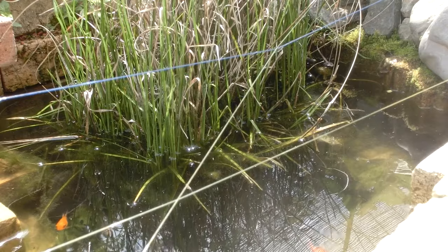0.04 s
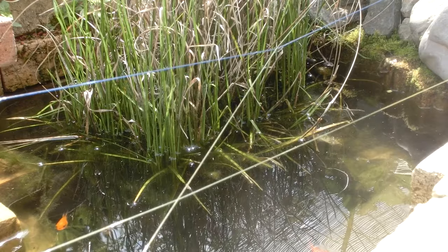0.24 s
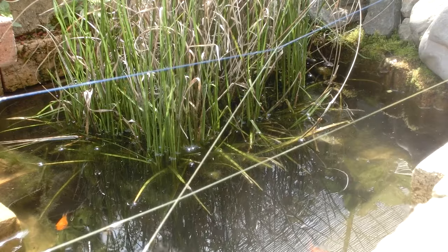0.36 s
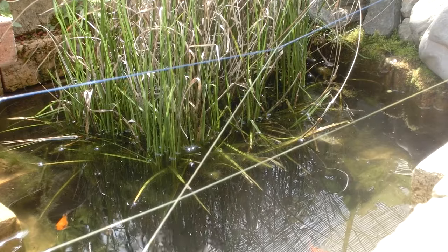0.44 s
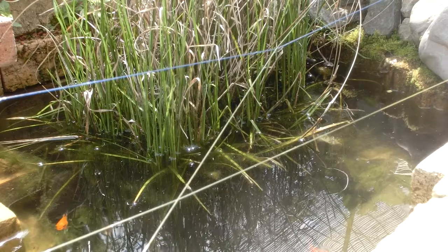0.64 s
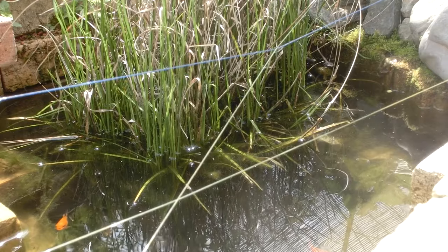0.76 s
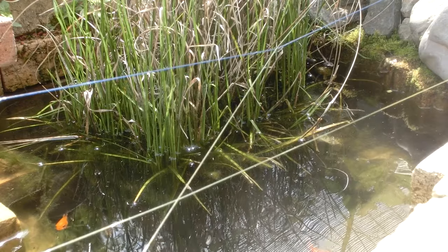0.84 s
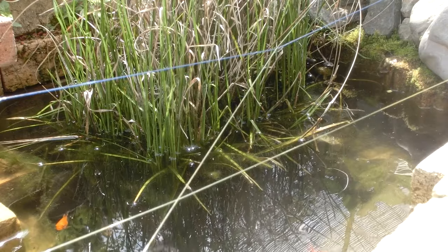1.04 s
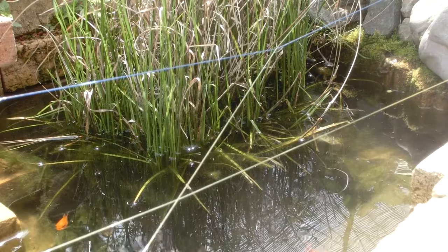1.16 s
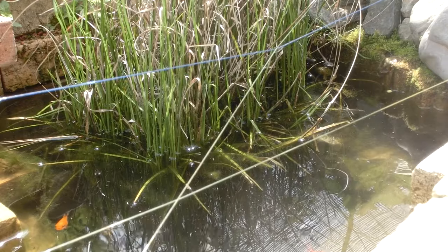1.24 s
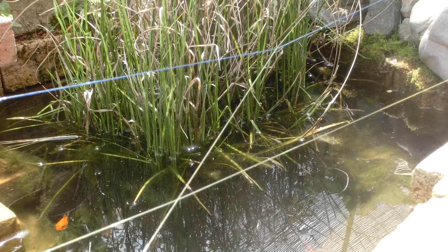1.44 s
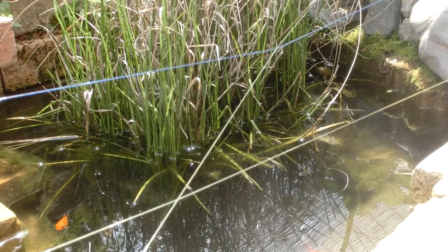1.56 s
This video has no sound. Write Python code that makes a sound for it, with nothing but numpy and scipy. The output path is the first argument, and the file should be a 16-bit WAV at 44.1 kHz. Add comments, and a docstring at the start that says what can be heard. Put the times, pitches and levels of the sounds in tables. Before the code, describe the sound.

A frog gives one short, rattling croak close by, over faint outdoor background.

```python
"""A frog gives one rattling croak from the reeds of a small garden pond, close by.
The croak is a train of larynx clicks, about 53 a second, each exciting the resonances of throat and
vocal sac; it swells and ends on a doubled click. A rasp and a low throb go with each click, and a soft
plop follows the last. Rim stones, reeds and the garden reflect the ringing clicks, over a faint
outdoor murmur and a low hum."""
import sys
import numpy as np
from scipy import signal
from scipy.fft import rfft, irfft
from scipy.io import wavfile

SR = 44100
rng = np.random.default_rng(int(sys.argv[2]) if len(sys.argv) > 2 else 0)


def output_pcm(signal):
    """Save a mono or channel-first signal as 16-bit PCM at the path in sys.argv[1].

    Samples are clipped to [-1, 1] before scaling.
    """
    pcm = np.clip(np.atleast_2d(signal).T, -1, 1) * 32767
    wavfile.write(sys.argv[1], SR, np.round(pcm).astype(np.int16))


N = 70560

# larynx clicks: t/s, level/dB, sac tuning ratio, tilt/(dB per octave), second snap gain, rasp level/dB
CLICKS = [(.12893, -26, 1, 0, .1, -13), (.15698, -25, 1, 0, .1, -12), (.17573, -21.5, 1, 0, .1, -11),
          (.19425, -11.7, .99, -.5, .05, -7), (.22836, -6.5, .99, -.3, 0, -3),
          (.24902, -4.3, .99, -.5, .05, -5), (.27307, -8.8, 1.01, 2.7, 0, 1), (.28585, -2.3, 1, .3, 0, 0),
          (.30613, -2.4, 1, 1.3, 0, 1), (.32276, -.4, .99, .6, .03, 1), (.34312, -1, 1, .7, 0, 1),
          (.36089, -.2, 1, -.7, 0, -1), (.3796, .2, 1, -.8, 0, -1), (.39864, -.1, .98, -2.8, 0, -4),
          (.4174, -.2, .97, -4, .04, -6), (.43847, -2.7, .97, -4, 0, -9), (.45683, -3.7, .97, -2, 1, 3)]


def croak():
    """Impulse excitation: each click rings the damped modes of the sac, which slackens and dulls late on."""
    # modes of throat and vocal sac: f/Hz, bandwidth/Hz, gain (negative: antiphase to the main mode)
    sac_modes = [(850, 220, -.85), (1160, 125, -3.0), (1785, 236, 10.4), (2404, 211, -2.65),
                 (2689, 115, 1.15), (3265, 1200, -.9)]
    snap_gap_s, low_cut_hz, high_cut_hz, gain_db = 0.00022, 430, 9000, 0.5
    octaves = np.log2(np.clip(frequencies(), 1400, 4000) / 1750)
    spectrum = 0
    for onset, db, tuning, tilt, second_snap, _ in CLICKS:
        ring = sum(gain * resonance(hz * tuning, width) for hz, width, gain in sac_modes)
        snaps = delay(onset) * (1 + second_snap * delay(snap_gap_s))
        spectrum += ring * snaps * amplitude(db + tilt * octaves)
    s = 1j * frequencies() / low_cut_hz
    radiation = s ** 2 / (1 + np.sqrt(2) * s + s ** 2)  # a small body radiates little bass
    softening = 1 / (1 + 1j * frequencies() / high_cut_hz)
    return irfft(spectrum * radiation * softening, N) * amplitude(gain_db)


def rasp():
    """Turbulence: air tears through the larynx at each click, and the hardest clicks also sizzle."""
    # spectrum of the rasp: f/Hz, relative level/dB
    rasp_spectrum = [(1800, -22), (2600, -21), (2850, -3), (3300, 10.5), (3900, 0), (4300, -37),
                     (6000, -32), (16000, -50)]
    # spectrum of the sizzle: f/Hz, relative level/dB
    sizzle_spectrum = [(3500, -16), (4500, -5.5), (5200, -1.5), (5750, -0.5), (6200, -5.5), (6800, 1),
                       (7600, -9), (8500, -7), (9800, -3.5), (11000, -12), (16000, -25)]
    _, click_db, *_, rasp_db = np.array(CLICKS).T
    tearing = click_bursts(rasp_db - 35.5, rasp_spectrum, decay_s=0.0024)
    sizzle_db = 2.05 * click_db - 38  # grows about as the square of the click's amplitude
    return tearing + click_bursts(sizzle_db, sizzle_spectrum, decay_s=0.0027)


def click_bursts(levels_db, spectrum, decay_s):
    """Amplitude modulation: a brief envelope at each click gates coloured noise."""
    # likeness of the two channels: f/Hz, correlation
    coherence = [(3000, 1), (6500, 0.56), (10000, 0.25)]
    envelope = sum(amplitude(db) * pulse(onset, rise_s=0.00018, decay_s=decay_s)
                   for (onset, *_), db in zip(CLICKS, levels_db))
    return envelope * coloured(stereo_noise(coherence), amplitude(curve(spectrum)))


def throb():
    """A heavily damped oscillator: the frog's body answers every click with a faint thud."""
    pushes = sum(amplitude(db) * delay(onset) for onset, db, *_ in CLICKS)
    return irfft(pushes * resonance(hz=150, width_hz=170), N) * amplitude(-19)


def plop():
    """Exponential decay of a low noise band, heard as a soft puff just after the last click."""
    envelope = pulse(onset_s=0.473, rise_s=0.008, decay_s=0.014)
    return narrow_noise(hz=390, width_hz=130) * envelope * amplitude(-47)


def pond(call):
    """Superposition: the direct call adds to stone echoes, reed scatter and the garden's reverberation."""
    # echoes from the rim stones and a farther rock: delay/s, gain
    stone_echoes = [(.002134, -.115), (.003418, -.073), (.00396, .11), (.004477, -.09), (.007918, .034),
                    (.0172, .025)]
    # scatter in the reeds: f/Hz, level/dB relative to the direct sound
    reed_spectrum = [(300, 1), (700, -9), (1700, -17), (3000, -9), (4500, -1), (6500, -19), (10000, -20),
                     (16000, -7)]
    # likeness of the two channels in the scatter: f/Hz, correlation
    reed_coherence = [(500, 0.65), (2000, 0.13), (5000, 0.93), (12000, 0)]
    # reverberation of the garden: f/Hz, level/dB relative to the direct sound
    garden_spectrum = [(300, -14), (800, -6), (1100, -14), (1800, -20), (2200, -15.5), (3000, -14.5),
                       (6000, -6), (16000, 5)]
    # likeness of the two channels in the reverberation: f/Hz, correlation
    garden_coherence = [(500, 1), (2000, 1), (8000, 0.23)]
    stones = sum(gain * delay(lag) for lag, gain in stone_echoes)
    reeds = diffuse_field(reed_spectrum, reed_coherence, t60_s=0.024, rise_s=0.00022)
    garden = diffuse_field(garden_spectrum, garden_coherence, t60_s=0.26, rise_s=0.0052)
    return irfft(rfft(call) * (1 + stones + reeds + garden), N) * pan(-1)


def diffuse_field(spectrum, coherence, t60_s, rise_s):
    """Frequency response of many small reflections that build up, then decay exponentially."""
    t = np.arange(N) / SR
    envelope = (1 - np.exp(-t / rise_s)) * np.exp(-np.log(1000) * t / t60_s)
    envelope /= np.sqrt(np.sum(envelope ** 2))
    return rfft(stereo_noise(coherence) * envelope) * amplitude(curve(spectrum))


def outdoor_air():
    """Broadband ambient noise: a distant murmur under thin hiss, its level wavering a little."""
    # spectral density of the outdoor noise: f/Hz, relative level/dB
    air_spectrum = [(15, -69), (25, -17), (92, -14.5), (137, -19), (242, -10), (270, -8.5), (335, -8),
                    (607, -6.5), (734, -9.5), (988, -12), (1740, -18.5), (1890, -17), (2480, -21.5),
                    (13600, -26.5), (16000, -33)]
    # likeness of the two channels: f/Hz, correlation
    air_coherence = [(30, 0.7), (120, 0.51), (300, 0.8), (700, 0.88), (1500, 0.58), (3000, 0.24), (6000, 0),
                     (12000, 0)]
    level_db, waver_db, waver_hz = -54, 0.3, 6
    air = coloured(stereo_noise(air_coherence), amplitude(curve(air_spectrum)))
    waver = coloured(rng.standard_normal(N), 1 / (1 + (frequencies() / waver_hz) ** 2))
    return air * amplitude(level_db + waver_db * waver) * pan(-1.1)


def hum():
    """Narrow-band noise, heard as a faint, unsteady low tone that swells once."""
    # envelope of the hum: t/s, level/dB
    swell = [(0, -76), (.95, -73), (1.11, -59), (1.2, -68.5), (1.6, -89)]
    level_db = np.interp(np.arange(N) / SR, *np.array(swell).T)
    return narrow_noise(hz=276, width_hz=16) * amplitude(level_db)


def amplitude(db):
    """Amplitude ratio of a level in decibels."""
    return 10 ** (np.asarray(db) / 20)


def frequencies():
    """f/Hz of each spectral bin, kept above zero."""
    return np.maximum(np.arange(N // 2 + 1) * SR / N, 1e-3)


def curve(points):
    """Interpolation of (f/Hz, value) points on a logarithmic frequency axis."""
    hz, value = np.array(points, float).T
    return np.interp(np.log(frequencies()), np.log(hz), value)


def resonance(hz, width_hz):
    """Frequency response of a damped oscillator, unity at its peak."""
    s = 1j * frequencies()
    return s * width_hz / (hz ** 2 + s * s + s * width_hz)


def delay(seconds):
    """A delay is a phase lag proportional to frequency."""
    return np.exp(-2j * np.pi * frequencies() * seconds)


def pulse(onset_s, rise_s, decay_s):
    """Envelope with exponential rise and decay."""
    age = np.maximum(np.arange(N) / SR - onset_s, 0)
    return (1 - np.exp(-age / rise_s)) * np.exp(-age / decay_s)


def pan(db):
    """Channel gains for a level difference, left minus right."""
    return amplitude(np.array([[db], [-db]]) / 2)


def coloured(noise, response):
    """Noise filtered by a frequency response and scaled to unit rms."""
    filtered = irfft(rfft(noise) * response, N)
    return filtered / np.sqrt(np.mean(filtered ** 2))


def narrow_noise(hz, width_hz):
    """Noise in one Gaussian band, at unit rms."""
    return coloured(rng.standard_normal(N), np.exp(-((frequencies() - hz) / width_hz) ** 2))


def stereo_noise(coherence):
    """Partly coherent white noise: the balance of mid and side sets the correlation in each band."""
    correlation = np.clip(curve(coherence), -0.99, 0.99)
    mid, side = rfft(rng.standard_normal((2, N)))
    mid *= np.sqrt((1 + correlation) / 2)
    side *= np.sqrt((1 - correlation) / 2)
    return irfft(np.array([mid + side, mid - side]), N)


def scene():
    """The sound pressures of frog and background add linearly."""
    return pond(croak()) + rasp() + throb() + plop() + outdoor_air() + hum()


def record(dry):
    """Band limiting: a steep elliptic low-pass removes the highest treble."""
    cutoff_hz = 16100
    return signal.sosfilt(signal.ellip(10, 0.1, 70, cutoff_hz, fs=SR, output="sos"), dry)


dry = scene()
out = record(dry)
output_pcm(out)
```